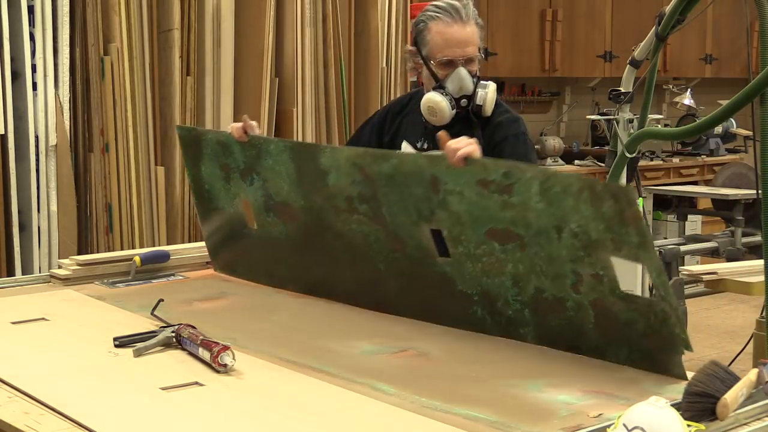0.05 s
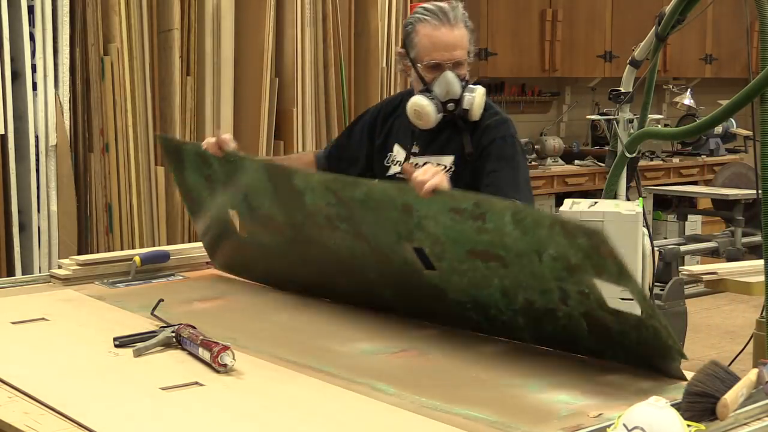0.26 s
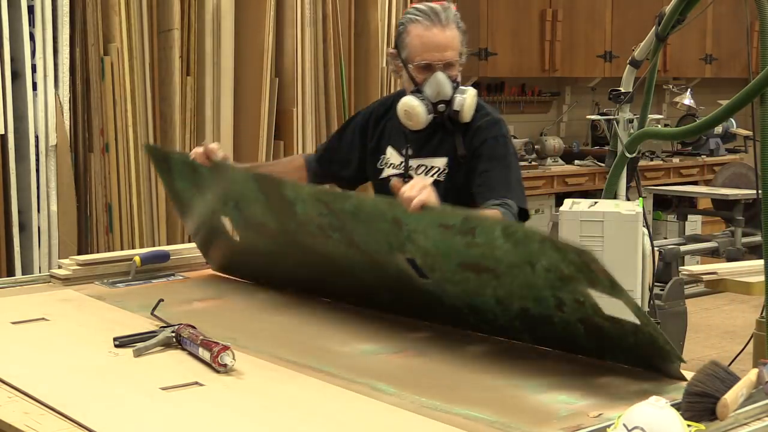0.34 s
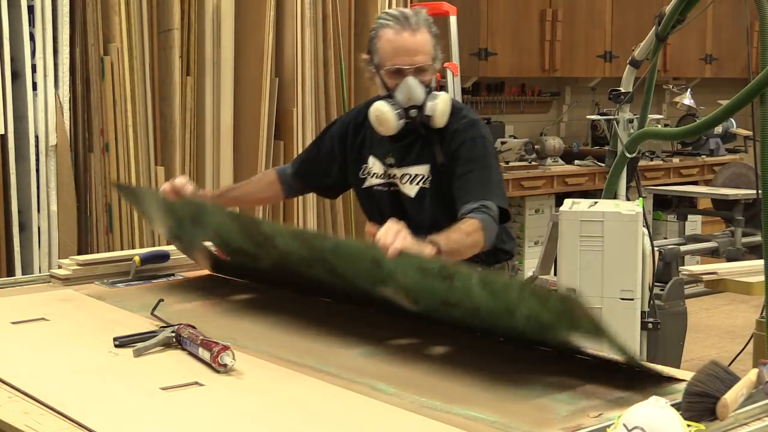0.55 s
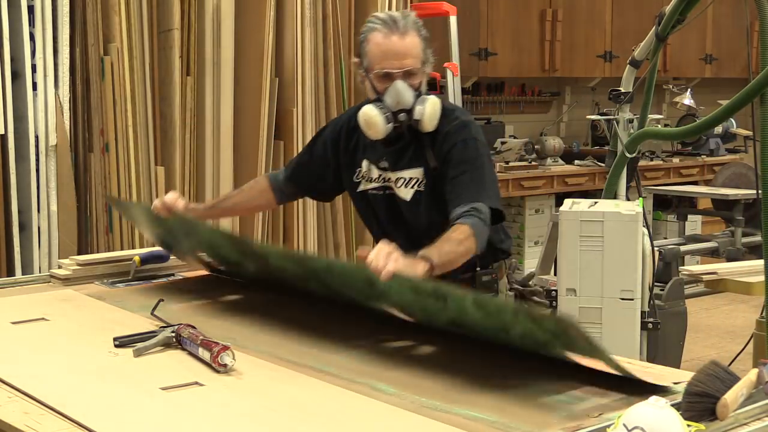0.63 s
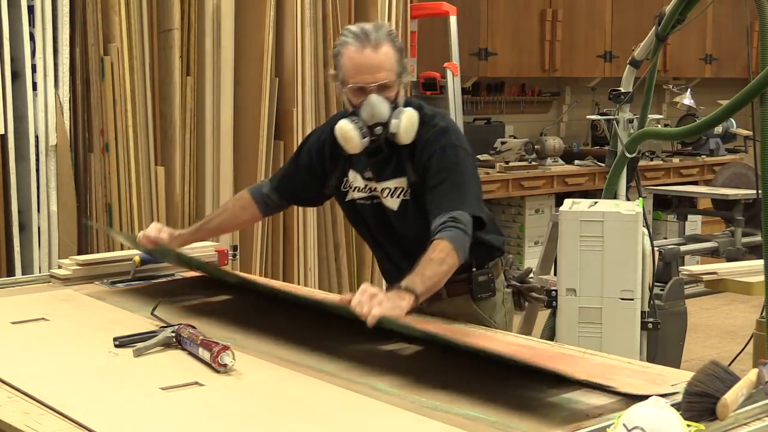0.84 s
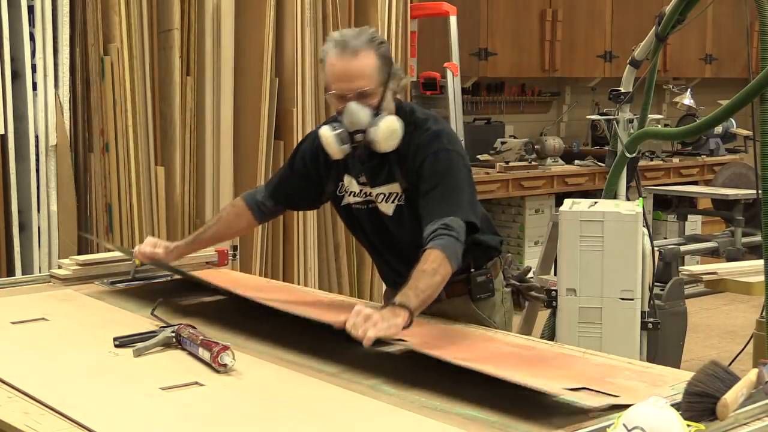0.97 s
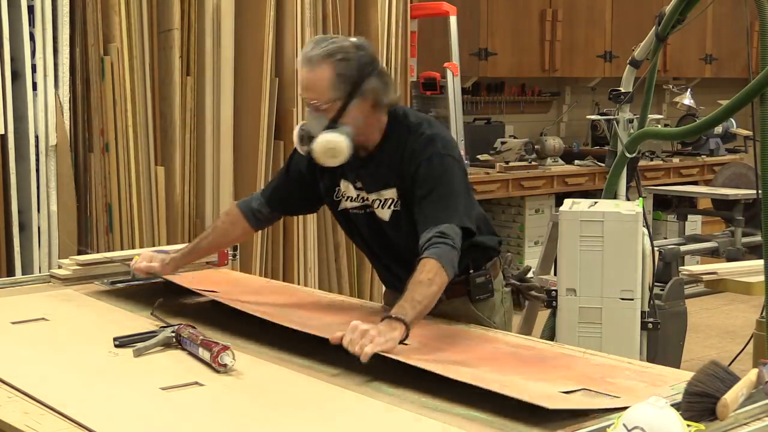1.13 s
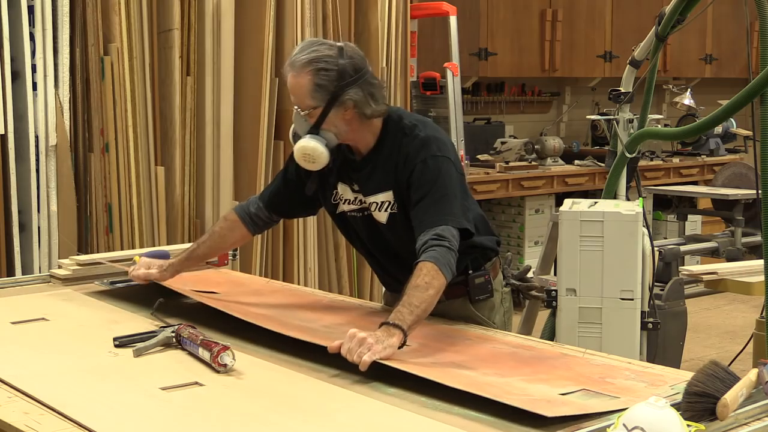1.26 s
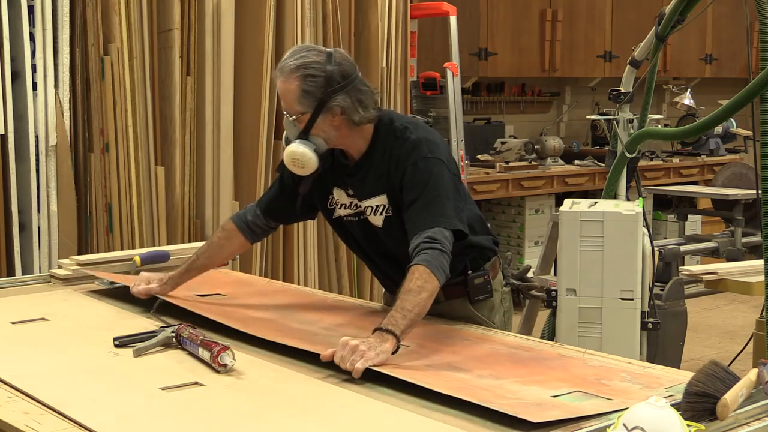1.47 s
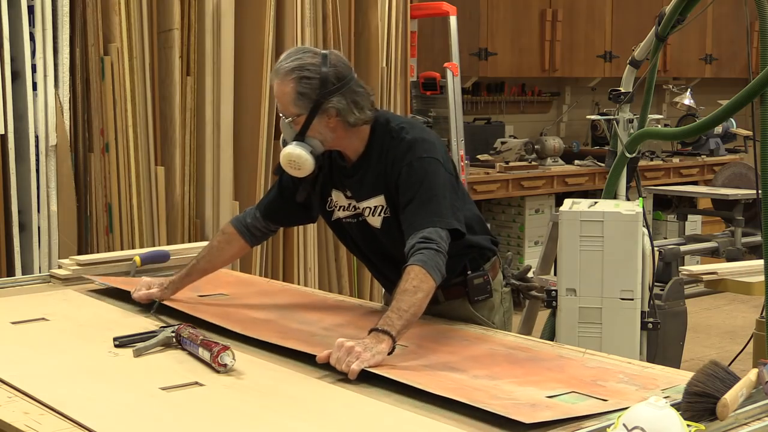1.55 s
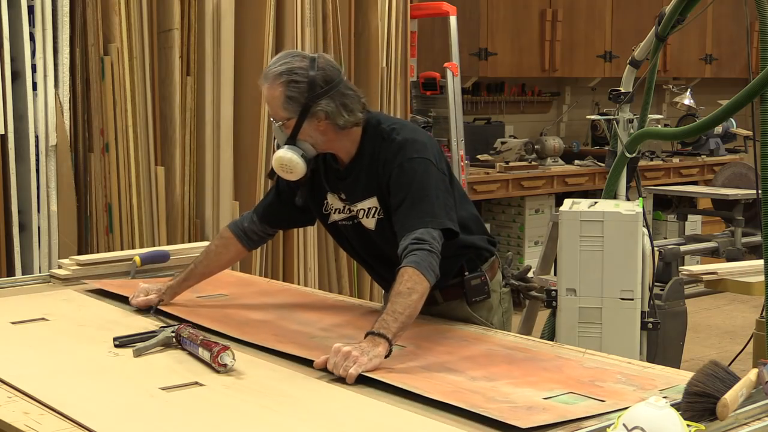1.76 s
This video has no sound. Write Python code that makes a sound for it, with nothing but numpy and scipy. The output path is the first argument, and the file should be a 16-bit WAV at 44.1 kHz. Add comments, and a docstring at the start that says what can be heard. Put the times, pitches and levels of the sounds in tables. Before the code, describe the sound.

A thin metal sheet pivots on a wooden workbench, its edge scraping and ticking from the start. From about 0.4 to 0.8 seconds it flexes with a low, wobbling boom, loudest near 0.6, with brief edge chatter. It taps down around 1 second, clicks sharply at 1.4 and slides with a scrape until 1.7. A machine hums faintly in the workshop. Everything is heard on the left.

```python
"""A metal sheet tipped over

A long, thin sheet pivots on a wooden workbench, its edge scraping and ticking by stick-slip friction.
It flops over with a low, wobbling boom as bending shifts its modes, and its edge sizzles briefly.
It then taps down and is slid into place. A machine hums faintly in the reverberant workshop.
The microphone feeds the left channel."""
import sys
import numpy as np
from scipy import signal
from scipy.fft import rfft, irfft
from scipy.io import wavfile

SR = 44100
rng = np.random.default_rng(int(sys.argv[2]) if len(sys.argv) > 2 else 0)


def put_to_file(sound):
    """Save the sound as 16-bit audio at rate SR, in the file named by the first command-line argument."""
    columns = np.atleast_2d(sound).T  # one column per channel
    safe = np.clip(columns, -1, 1)
    whole_steps = np.round(safe * 32767)
    wavfile.write(sys.argv[1], SR, whole_steps.astype(np.int16))


N = 79380
TIME = np.arange(N) / SR

# flexing blows (time [s], level [dB], lower band edge [Hz], upper band edge [Hz], rise [s])
FLEX_BLOWS = [(0.019, -39, 90, 318, 0.0071), (.095, -38.5, 150, 750, 0.0067),
              (.195, -33.5, 78.6, 166, 0.0086), (0.358, -30, 110, 417, 0.0013), (0.4, -27, 80, 340, 0.0054),
              (.449, -29.5, 124, 294, .002), (.528, -24, 121, 157, 0.023), (.554, -22.5, 178, 544, 0.011),
              (.568, -16.5, 141, 200, 0.002), (.589, -14.5, 175, 235, 0.0016),
              (.598, -24, 450, 560, 0.0034), (.618, -18, 190, 323, 0.0028), (0.627, -26.5, 50, 100, 0.0069),
              (.657, -28.5, 400, 730, 0.0087), (.664, -33, 170, 298, 0.0056),
              (.687, -21.5, 64.4, 121, 0.013), (.722, -21.5, 325, 770, 0.0068),
              (.733, -25, 202, 453, 0.0038), (.782, -36.5, 377, 525, 0.0023), (0.794, -29, 50, 149, 0.011),
              (0.976, -42, 202, 640, 0.002)]
# strongest modes of the sheet (frequency [Hz], relative level [dB], small-amplitude T60 [s])
MAIN_MODES = [(76, -8.5, 0.9), (115, 0, 0.48), (143.2, -3, 0.47), (194.2, 2, 0.26), (259.2, 3.5, 0.38),
              (325, 3, 0.15), (412.4, -3.5, 0.2), (490.4, -1, 0.32), (625.5, 0, 0.39), (771, -13, 0.34),
              (1020, -34, 0.4)]
# spectral envelope of the weaker modes (frequency [Hz], relative level [dB])
WEAK_MODE_SPECTRUM = [(40, 3), (70, 2.5), (130, -1.5), (260, 1.5), (400, -1), (650, -3.5), (900, -16),
                      (1400, -41)]
WEAK_MODE_DB, WEAK_MODE_T60_S = -4, 0.21
# bending changes the sheet's stiffness (time [s], nominal frequency ratio [1])
BEND_RATIO = [(0, 1.007), (.5, 0.99), (.57, 0.93), (.64, 1.06), (.73, 1.08), (.8, 1.0), (1.0, 0.95)]
BEND_SPREAD, SHAPE_DETUNE = 0.8, 0.0606  # modes follow the bend unequally; each flex finds a new shape
FLEX_BAND_ORDER = 3.54
LOUD_DAMPING_PER_S = 39  # at full level: a hard flex loses its energy faster

# ticks of the edge on the bench (time [s], level [dB], treble tilt [dB/octave])
EDGE_TICKS = [(0.0501, -23.5, 0.5), (0.107, -38, 8), (.1175, -37, 6), (0.1396, -43, -8), (0.156, -40, -2),
              (0.198, -29.5, -1.5), (.2677, -32, 6), (0.2841, -29.5, -2.5), (0.293, -29.5, -1.5),
              (0.359, -32, -4), (0.563, -24, -5), (0.5809, -26, -3.5), (0.5865, -24.5, -2.5),
              (.7168, -30.5, -7.5), (0.8742, -40.5, -6), (0.9338, -26.5, -2.5), (0.945, -24.5, 14),
              (.976, -22, -2), (0.9895, -25.5, 8), (1.062, -30, 1), (1.0831, -28.5, 1.5), (1.137, -28.5, 1),
              (1.363, -33, 1), (1.403, -17, 4.7), (1.429, -29, -8), (1.4555, -28.5, -2), (1.605, -37, -5),
              (1.641, -26.5, -4.5), (1.684, -31, -1.5), (1.7065, -29, 3)]
# spectrum of a tick (frequency [Hz], relative level [dB])
TICK_SPECTRUM = [(200, -40), (900, 3), (1800, 0), (3200, -2), (5000, 1.5), (9000, -0.5), (10500, 6),
                 (13500, 4.5), (16500, -2)]
TICK_RISE_S, TICK_DECAY_S, TICK_TAIL_DB, TICK_TAIL_S = 0.00039, 0.0013, -25.5, 0.032
# firm landings of the edge (time [s], level [dB], frequency [Hz], decay [s])
EDGE_KNOCKS = [(.4512, -24.5, 556, 0.0013), (.563, -22.5, 3520, 0.0013), (0.5866, -21, 3120, 0.0013),
               (.717, -33, 4800, 0.0018), (0.931, -28, 76.6, 0.012), (.9335, -29.5, 2720, 0.0018),
               (.934, -38, 960, 0.0071), (.9762, -30, 3010, 0.0016), (1.402, -33.5, 60, 0.012),
               (1.4023, -22, 1150, 0.0012)]
# chatter after a blow (time [s], level [dB], decay [s], treble tilt [dB/octave])
EDGE_SIZZLES = [(0.042, -43, 0.034, -9.5), (.168, -44.5, 0.021, -1), (0.22, -39, 0.01, 12),
                (.303, -39, 0.013, 2), (.409, -41.5, 0.016, -3), (.581, -28.5, 0.037, -9),
                (0.594, -31, 0.021, 1.5), (.722, -32, 0.036, -9), (.985, -40.5, 0.038, 7.5)]
# spectrum of the chatter (frequency [Hz], relative level [dB])
SIZZLE_SPECTRUM = [(500, 0.5), (1500, -4), (3000, -1), (5000, -1), (8500, 2.5), (12500, -2), (16500, -11)]
KNOCK_RISE_S, SIZZLE_RISE_S = 0.00037, 0.0016

# dull body and bright grit of the friction, in pivoting and in sliding (time [s], level [dB])
PIVOT_BODY_LEVEL = [(0, -36), (.11, -34), (.17, -38), (.24, -34.5), (.32, -34), (.4, -36.5), (.48, -35.5),
                    (.54, -42), (.85, -58), (.93, -50.5), (1.0, -45), (1.08, -46.5), (1.2, -51),
                    (1.33, -54.5)]
PIVOT_GRIT_LEVEL = [(0, -49.5), (.09, -48), (.21, -51.5), (.245, -54), (.27, -52), (.36, -53), (.44, -56.5),
                    (.48, -58), (.54, -51), (.68, -49), (.8, -61), (.925, -63), (.95, -45.5), (1.09, -55.5),
                    (1.18, -59), (1.33, -68.5)]
SLIDE_BODY_LEVEL = [(1.33, -59), (1.36, -54), (1.41, -43.5), (1.46, -37.5), (1.51, -33), (1.555, -31.5),
                    (1.595, -37.5), (1.66, -45), (1.705, -43), (1.735, -64), (1.8, -68)]
SLIDE_GRIT_LEVEL = [(1.33, -67.5), (1.355, -49), (1.41, -45), (1.46, -42.5), (1.565, -39.5), (1.66, -45.5),
                    (1.705, -44.5), (1.735, -55), (1.8, -63)]
# spectra of the same four sounds (frequency [Hz], relative level [dB])
PIVOT_BODY_SPECTRUM = [(50, -4.5), (110, 9), (200, 0.5), (400, -0.5), (700, -2.5), (1100, -9.5),
                       (1600, -20), (3000, -34), (8000, -64)]
PIVOT_GRIT_SPECTRUM = [(800, -12), (2000, -3), (3200, 0), (5000, 0.5), (9000, -2), (11000, -3.5),
                       (14000, 0.5), (16500, -10)]
SLIDE_BODY_SPECTRUM = [(50, -16), (200, -14), (400, -5.5), (490, -0.5), (560, 5), (650, -2.5), (820, -1.5),
                       (970, -4), (1150, -8.5), (1450, -11.5), (2500, -35.5), (8000, -30.5)]
SLIDE_GRIT_SPECTRUM = [(800, -23), (2000, 3), (3200, 6), (4500, 2), (7000, 1.5), (9300, -0.5), (10200, 2.5),
                       (13000, 3), (16500, -10)]
SLIPS_PER_S, SPURT_S = 5000, 0.0035

# reverberation of the workshop (frequency [Hz], T60 [s])
REVERB_TIMES = [(100, 0.61), (1000, 0.56), (4000, 0.22), (15000, 0.35)]
BOOM_REVERB_DB, CONTACT_REVERB_DB = -20, -12
# tones of the machine (frequency [Hz], level [dB])
HUM_TONES = [(96.9, -50.5), (240, -56)]
# air noise in the workshop (frequency [Hz], relative level [dB])
AIR_SPECTRUM = [(25, 2), (60, 4), (110, 14.5), (250, 1), (550, -4), (1000, -43.5), (2000, -10.5),
                (5000, -23), (12000, -22), (16500, -31)]
AIR_DB, RIGHT_GAIN_DB, RIGHT_HISS_DB = -50.5, -60.5, -74.5
CUTOFF_HZ = 16300


def flexes(weak_count=110):
    """Modal superposition: each flex rings a band of modes, which glide as bending alters stiffness."""
    out, t = np.zeros(N), TIME[:SR // 2]
    bend_integral = np.cumsum(curve(BEND_RATIO) - 1) / SR
    main_hz, main_db, main_t60 = np.transpose(MAIN_MODES)
    weak_hz = 40 + 12 * (np.arange(weak_count) + rng.random(weak_count))  # one mode in each 12 Hz
    rest_hz = np.r_[main_hz, weak_hz]
    strength = amp(np.r_[main_db, WEAK_MODE_DB + spectrum_at(WEAK_MODE_SPECTRUM, weak_hz)])
    t60 = np.r_[main_t60, np.full(weak_count, WEAK_MODE_T60_S)]
    decay = np.exp(-np.log(1000) * t / t60[:, None])
    for start, db, low_hz, high_hz, rise_s in FLEX_BLOWS:
        phase, detune, follow = rng.uniform(-0.955, 1, (3, len(rest_hz)))
        hz = rest_hz * (1 + SHAPE_DETUNE * detune)
        lowpass = (1 + (hz / high_hz) ** (2 * FLEX_BAND_ORDER)) ** -0.5
        highpass = (1 + (low_hz / hz) ** (2 * FLEX_BAND_ORDER)) ** -0.5
        glide = np.outer(hz * (1 + BEND_SPREAD * follow), np.interp(start + t, TIME, bend_integral))
        cycles = np.outer(hz, t) + glide + phase[:, None]
        ring = (strength * lowpass * highpass) @ (decay * np.sin(2 * np.pi * cycles))
        ring *= (1 - np.exp(-t / rise_s)) * np.exp(-LOUD_DAMPING_PER_S * amp(db) * t)
        add(out, start, amp(db) * ring / np.std(ring[:1500]))  # the first 34 ms set the level
    return out


def ticks():
    """Impulsive release: the edge catches and snaps free, a bright crack with a short metallic tail."""
    out, t = np.zeros(N), TIME[:4096]
    crack = np.exp(-np.maximum(t - TICK_RISE_S, 0) / TICK_DECAY_S)
    tail = amp(TICK_TAIL_DB) * np.exp(-t / TICK_TAIL_S)
    envelope = np.minimum(t / TICK_RISE_S, 1) * (crack + tail)
    for start, db, tilt_db in EDGE_TICKS:
        noise = colour(rng.standard_normal(len(t)), TICK_SPECTRUM, tilt_db)
        add(out, start, amp(db) * envelope * noise)
    return out


def knocks():
    """Damped oscillation: where the edge lands firmly, the struck spot rings for a few cycles."""
    out, t = np.zeros(N), TIME[:4096]
    for start, db, hz, decay_s in EDGE_KNOCKS:
        envelope = np.minimum(t / KNOCK_RISE_S, 1) * np.exp(-t / decay_s)
        add(out, start, amp(db) * envelope * np.sin(2 * np.pi * hz * t))
    return out


def sizzles():
    """Contact chatter: the shaking edge buzzes against the bench and dies away exponentially."""
    out = np.zeros(N)
    for start, db, decay_s, tilt_db in EDGE_SIZZLES:
        envelope = np.minimum(TIME / SIZZLE_RISE_S, 1) * np.exp(-TIME / decay_s)
        add(out, start, amp(db) * envelope * colour(slips(spread_db=3.5), SIZZLE_SPECTRUM, tilt_db))
    return out


def scrape(body_level, body_spectrum, grit_level, grit_spectrum, spurt_db):
    """Stick-slip friction: slips drive the sheet's dull body and a bright grit that comes in spurts."""
    force = slips(spread_db=2.5)
    knots = np.arange(1000) * SPURT_S
    spurts = np.interp(TIME, knots, rng.standard_normal(len(knots)))
    body = amp(curve(body_level)) * colour(force, body_spectrum)
    grit = amp(curve(grit_level) + spurt_db * spurts) * colour(force, grit_spectrum)
    return body + grit


def slips(spread_db):
    """Shot noise: tiny slips of uneven size occur at random moments."""
    size = amp(spread_db * np.minimum(rng.exponential(1, N), 4))
    return size * rng.choice([-1., 1.], N) * (rng.random(N) < SLIPS_PER_S / SR)


def room(x):
    """Reverberation: a diffuse tail whose treble dies first."""
    hz, t, noise = signal.stft(rng.standard_normal(SR // 2), SR, nperseg=256)
    decay = np.exp(-np.log(1000) * t / spectrum_at(REVERB_TIMES, hz)[:, None])
    _, tail = signal.istft(noise * decay, SR, nperseg=256)
    tail[:250] = 0  # the first reflection arrives after about 6 ms
    return signal.fftconvolve(x, tail / np.linalg.norm(tail))[:N]


def workshop():
    """Stationary background: the pure tones of a machine over broadband air noise."""
    hum = sum(amp(db) * np.sqrt(2) * np.sin(2 * np.pi * (hz * TIME + rng.random()))
              for hz, db in HUM_TONES)
    return hum + amp(AIR_DB) * colour(rng.standard_normal(N), AIR_SPECTRUM)


def colour(x, spectrum, tilt_db=0):
    """Linear filtering: imposes a spectrum and a tilt per octave above 1 kHz, then scales to rms 1."""
    hz = np.fft.rfftfreq(len(x), 1 / SR)
    octaves = np.log2(np.maximum(hz, 1000))
    gain = amp(spectrum_at(spectrum, hz) + tilt_db * octaves)
    shaped = irfft(rfft(x) * gain, len(x))
    return shaped / np.sqrt(np.mean(shaped ** 2) + 1e-20)


def amp(db):
    """Decibel law: 20 dB is a tenfold amplitude."""
    return 10 ** (np.asarray(db) / 20)


def spectrum_at(points, hz):
    """Interpolation on a log-frequency axis."""
    point_hz, value = np.transpose(points)
    return np.interp(np.log(hz + 1), np.log(point_hz + 1), value)


def curve(points):
    """Linear interpolation in time, at every sample."""
    return np.interp(TIME, *np.transpose(points))


def add(mix, start, sound):
    """Superposition: a sound joins the mix at its start time in seconds."""
    part = mix[max(round(start * SR), 0):][:len(sound)]
    part += sound[:len(part)]


def scene():
    """Superposition: sheet, contacts and room sum on the left; the right is a faint copy with hiss."""
    boom = flexes()
    contact = ticks() + knocks() + sizzles()
    contact += scrape(PIVOT_BODY_LEVEL, PIVOT_BODY_SPECTRUM,
                      PIVOT_GRIT_LEVEL, PIVOT_GRIT_SPECTRUM, spurt_db=4.0)
    contact += scrape(SLIDE_BODY_LEVEL, SLIDE_BODY_SPECTRUM,
                      SLIDE_GRIT_LEVEL, SLIDE_GRIT_SPECTRUM, spurt_db=1.2)
    reverb = room(amp(BOOM_REVERB_DB) * boom + amp(CONTACT_REVERB_DB) * contact)
    left = boom + contact + reverb + workshop()
    right = amp(RIGHT_GAIN_DB) * left + amp(RIGHT_HISS_DB) * rng.standard_normal(N)
    return np.array([left, right])


def record(dry):
    """Band limiting: a low-pass filter removes the highest treble."""
    lowpass = signal.firwin(255, CUTOFF_HZ, window=("kaiser", 9), fs=SR)
    return signal.oaconvolve(dry, lowpass[None], "same")


dry = scene()
out = record(dry)
put_to_file(out)
```